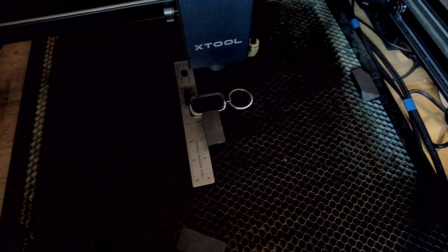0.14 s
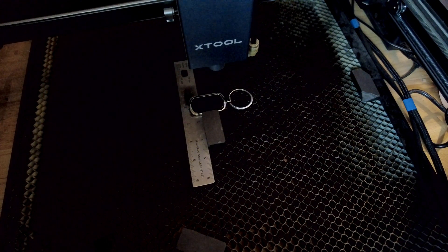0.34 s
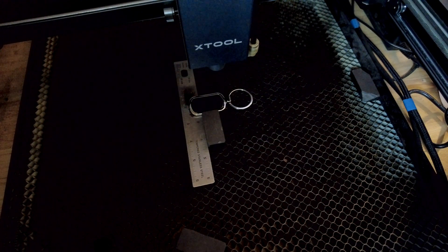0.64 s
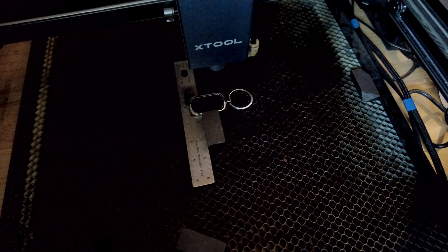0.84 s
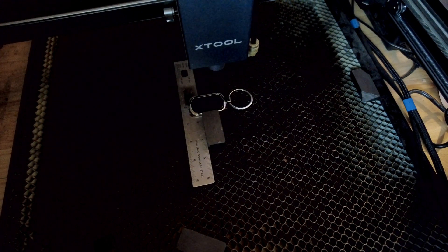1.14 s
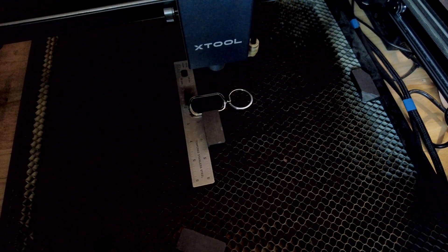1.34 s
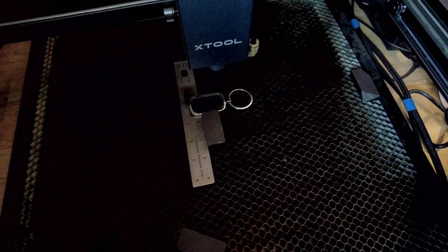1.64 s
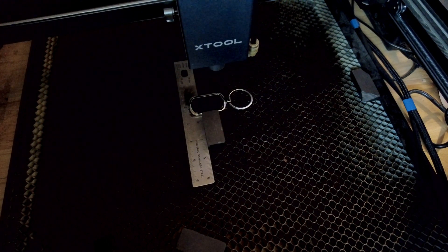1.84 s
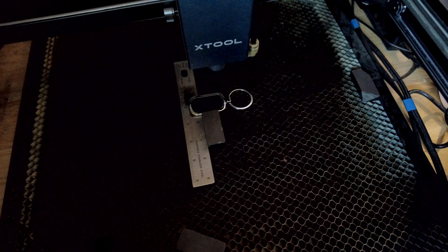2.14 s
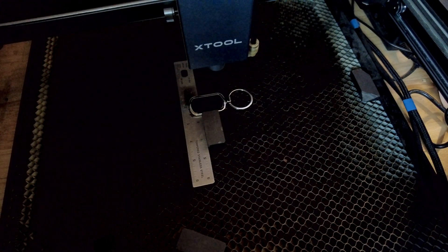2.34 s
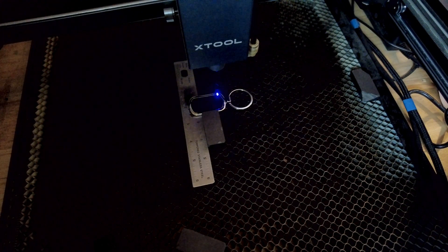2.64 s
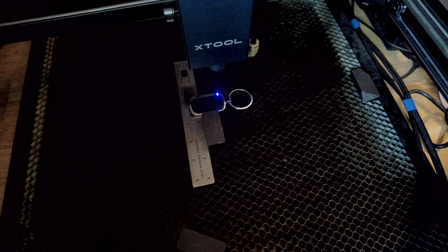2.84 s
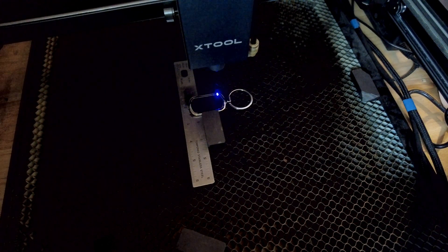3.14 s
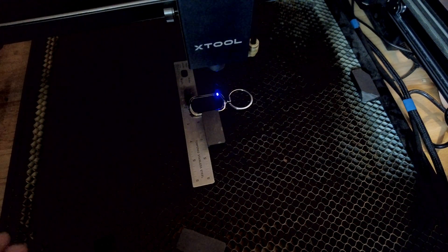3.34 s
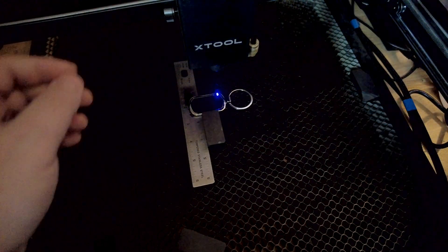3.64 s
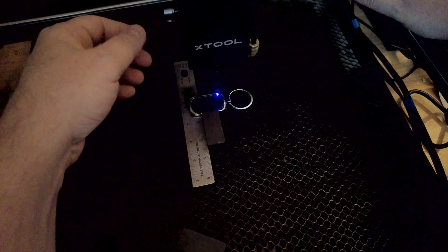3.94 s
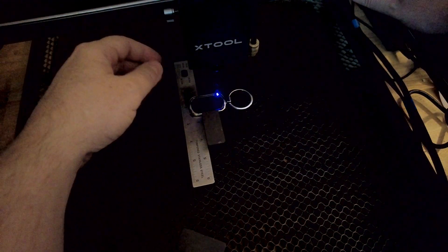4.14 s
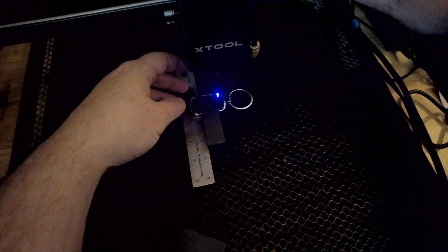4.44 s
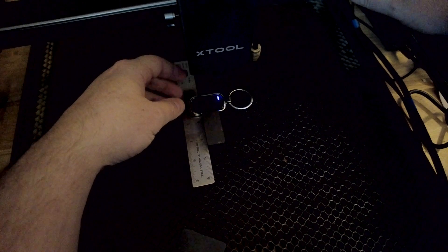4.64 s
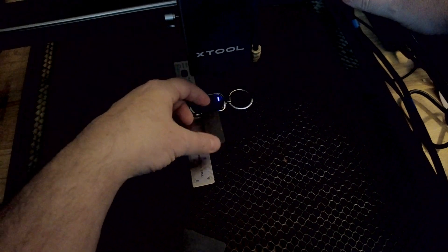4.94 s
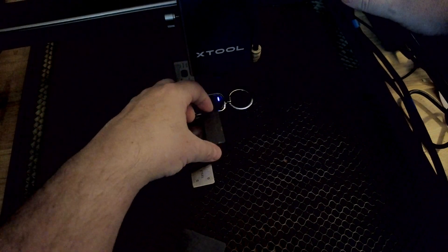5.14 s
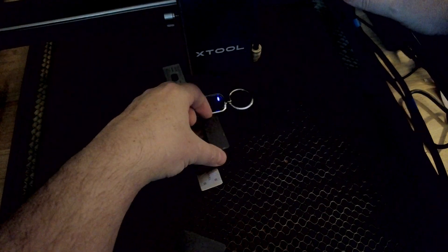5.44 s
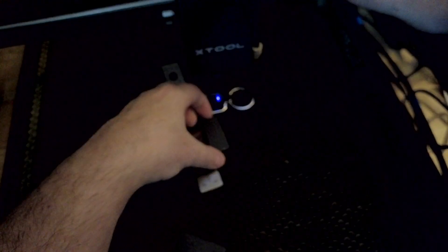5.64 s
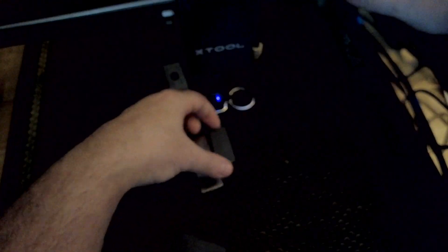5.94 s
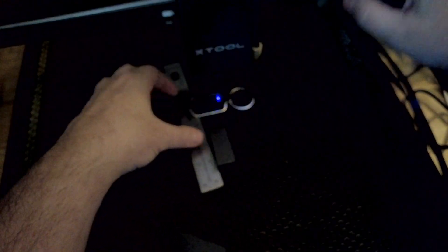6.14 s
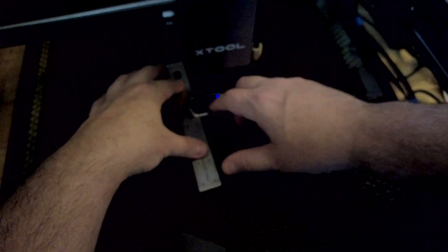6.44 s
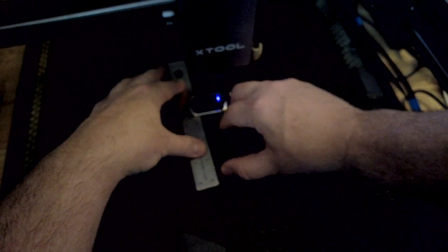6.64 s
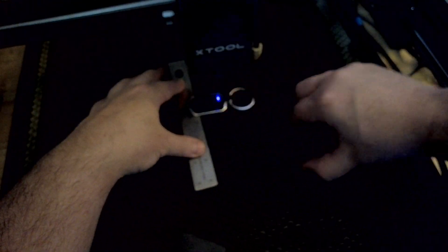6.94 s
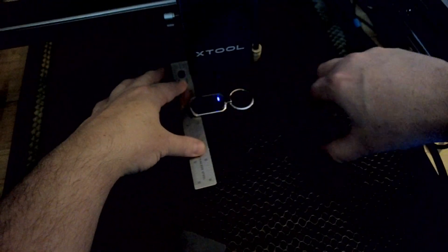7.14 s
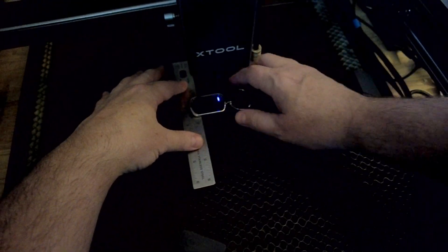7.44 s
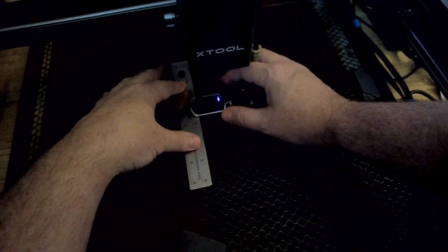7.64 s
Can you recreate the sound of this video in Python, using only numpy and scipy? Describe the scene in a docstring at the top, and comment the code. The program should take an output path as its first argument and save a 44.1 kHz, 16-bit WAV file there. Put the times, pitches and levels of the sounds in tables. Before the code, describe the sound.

A quiet indoor workshop, heard close in stereo: faint dull air and very thin idle equipment tones. Two small crisp plastic clicks come at 0.9 and 1.0 s, fainter clicks, finger brushes and a soft hollow tap around 1.5-1.8, and two more clicks at 2.4-2.5. A faint low motor drone begins near 2.3 and fades after 4.4. At about 2.65 a small fan starts, its whine rising fast with a rasp and a short rattle near 3.0, levelling by about 4.5 into a steady tonal whir, low hum and airy rush that continues to the end. Soft low rubs occur at 4.3-4.8, faint metallic slides at 5.4 and 5.85. From 6.6 to 7.2 hands shift a metal piece: hissing scrapes, a dull thump at 6.8, dry scuffs and tiny high pings, strongest near 7.0. Then only the fan remains.

```python
"""Small fan spin-up in a workshop

Button clicks in a quiet room, then the seven-blade fan of a laser head spins up and holds its speed.
Tones locked to the rotor angle make hum and whine; noise rings the housing as air; a second motor drones.
Hands rub the bed (low noise) and slide a metal piece across it (hiss, pings, scuffs)."""
import sys
import numpy as np
from scipy import signal
from scipy.fft import rfft, irfft, next_fast_len
from scipy.io import wavfile
from scipy.ndimage import uniform_filter1d, map_coordinates

SR = 44100
rng = np.random.default_rng(int(sys.argv[2]) if len(sys.argv) > 2 else 0)


def generate_wav(signal):
    """Clip the signal to [-1, 1] and save it as 16-bit WAV at the path in sys.argv[1]."""
    frames = np.transpose(np.atleast_2d(signal))
    scaled = np.clip(frames, -1, 1) * 32767
    pcm = np.round(scaled).astype(np.int16)
    wavfile.write(sys.argv[1], SR, pcm)


N = 342657
TIME = np.arange(N) / SR


def amp(db):
    """Decibels to gain."""
    return 10 ** (np.asarray(db) / 20)


def unit(x):
    """Scale to rms 1."""
    return x / np.sqrt(np.mean(x ** 2) + 1e-20)


def along(points, hz):
    """Interpolate (hz, value) points on a log-frequency axis."""
    f, v = np.transpose(points)
    return np.interp(np.log(hz + 1), np.log(f + 1), v)


def wobble(rate_hz):
    """Smooth random curve with rate_hz knots a second."""
    knots = rng.standard_normal(int(N * rate_hz / SR) + 4)
    return map_coordinates(knots, [TIME * rate_hz])


def bell(x, centre, width):
    """Resonance shape: 1 at its centre, a half at the edges of its width."""
    return 2 ** -((2 * (x - centre) / width) ** 2)


def stroke(start_s, length_s, attack_s, release_s):
    """Envelope: linear rise from start_s, hold to start_s + length_s, exponential decay."""
    rise = np.clip((TIME - start_s) / attack_s, 0, 1)
    return rise * np.exp(-np.maximum(TIME - start_s - length_s, 0) / release_s)


def filtered(x, response):
    """Multiply the spectrum of x by a response of frequency."""
    m = next_fast_len(N + SR // 2)
    return irfft(rfft(x, m) * response(np.fft.rfftfreq(m, 1 / SR)), m)[..., :N]


def stereo_noise(spectrum, alike):
    """Coloured noise of rms 1; likeness of left and right sets the mid/side split."""
    def split(hz):
        turn = np.arccos(np.clip(along(alike, hz), -1, 1)) / 2
        return amp(along(spectrum, hz)) * [np.cos(turn), np.sin(turn)]
    mid, side = filtered(rng.standard_normal((2, N)), split)
    return unit(np.array([mid + side, mid - side]))


def patchy(x, db, size, count):
    """Random gain patches over pitch and time: frames of size samples, smoothed over count frames."""
    z = signal.stft(x, nperseg=size)[2]
    patches = uniform_filter1d(rng.standard_normal(z.shape[1:]), size=5, axis=0)
    patches = unit(uniform_filter1d(patches, size=count, axis=1))
    return unit(signal.istft(z * amp(db * patches), nperseg=size)[1][:, :N])


def tone(angle, lead_rad, waver_db, rate_hz, apart=0.43):
    """Stereo sine of rms 1: left leads by lead_rad, both sides waver mostly together."""
    common = wobble(rate_hz)
    waver = amp(waver_db * (common + apart * np.array([wobble(rate_hz), wobble(rate_hz)])))
    return unit(waver * np.sin([angle + lead_rad / 2, angle - lead_rad / 2]))


# room air colour: pitch_hz, relative density_db (per Hz)
ROOM_COLOUR = [(12, -23), (20, 1), (106, -6), (137, -11), (196, -11.5), (427, -16.5), (465, -17),
               (620, -15.5), (790, -21), (1070, -23), (1340, -18.5), (1500, -22.5), (2400, -23.5),
               (10800, -39), (13500, -47), (15500, -47)]
# room air stereo: pitch_hz, left-right likeness (-1 to 1)
ROOM_LIKENESS = [(45, .99), (120, .96), (200, 0.91), (400, 0.42), (1000, -0.43), (1500, 0.51),
                 (2600, -0.0028), (6000, 0.3), (15000, 1)]
# idle equipment tones: pitch_hz, level_db, left_lead_rad, smear_rad, waver_db
IDLE_TONES = [(102.3, -72.5, 0.11, 1.0, 3.5), (298, -82, .5, 1.6, 3.5), (592, -80.5, 0.6, 4, 3.8),
              (1125, -80.5, 1.95, 1.3, 3.2), (1314, -79.7, -0.33, .5, 2.5)]


def room(drift_db=.5, middle_drift_db=1):
    """Mottled air murmur with a drifting middle band, plus thin wavering tones of idle equipment."""
    lines = sum(amp(db) * tone(2 * np.pi * hz * TIME + smear_rad * wobble(18), lead_rad, waver_db, 9.09)
                for hz, db, lead_rad, smear_rad, waver_db in IDLE_TONES)
    air = patchy(stereo_noise(ROOM_COLOUR, ROOM_LIKENESS), db=1.8, size=2048, count=5)
    middle = filtered(air, lambda hz: bell(hz, 1140, 1100))
    air = air + (amp(middle_drift_db * wobble(13)) - 1) * middle
    return amp(-63.0 + drift_db * wobble(4.5)) * air + lines


# clicks and small taps: start_s, relative level_db, ring_and_tail_db, pitch_hz, top_treble_db
CLICK_EVENTS = [(0.8985, -41, -6, 8800, -4), (0.9864, -40.5, 0, 7700, 4), (1.577, -55, -5, 9500, 0),
                (1.6826, -48.5, -4, 4700, -9), (1.7714, -53, -5, 8000, -1), (2.395, -42, -1, 8600, -1),
                (2.4955, -40.5, 0, 7000, 4)]
# colour of clicks and brushes: pitch_hz, relative density_db (per Hz)
PLASTIC_COLOUR = [(300, -14), (1400, -5), (2700, -10), (4300, 1), (6500, -3), (7700, 0), (10500, -3),
                  (14200, 3), (15700, -1)]
# button thud and springy ring: pitch_hz, relative level_db, t60_s
BUTTON_MODES = [(130, 5, .22), (4900, -19, .15), (6030, -17.5, .42)]
CLICK_TRIM_DB = -8.5


def clicks(crack_t60_s=0.018, tail_db=-9, tail_t60_s=0.21, grain_db=3, rebound_s=.0098, rebound_db=-11,
           ring_smear_rad=1.3, lift_db=5, width_hz=2600):
    """Short pitched noise crack, one rebound, rough springy ring and the room's scattered tail."""
    out, t = np.zeros((2, N)), np.arange(SR // 2) / SR
    first = amp(-60 * t / crack_t60_s) * (1 - np.exp(-t / .0005))
    rebound = (t > rebound_s) * amp(rebound_db - 60 * np.abs(t - rebound_s) / crack_t60_s)
    blows = first + rebound
    for start_s, db, ring_db, pitch_hz, treble_db in CLICK_EVENTS:
        crack = blows * (rng.standard_normal(len(t)) + .5 * rng.standard_normal((2, len(t))))
        ring = 0
        for hz, mode_db, t60_s in BUTTON_MODES:
            phase = 2 * np.pi * (hz * t + rng.random((2, 1))) + ring_smear_rad * wobble(600)[:len(t)]
            ring = ring + amp(mode_db - 60 * t / t60_s) * np.sin(phase)
        grain = grain_db * wobble(700)[:len(t)]
        tail = amp(tail_db + grain - 60 * t / tail_t60_s) * rng.standard_normal((2, len(t)))

        def colour(hz):
            treble = along([(8000, 0), (14000, treble_db)], hz)
            return amp(along(PLASTIC_COLOUR, hz) + lift_db * bell(hz, pitch_hz, width_hz) + treble)
        click = filtered(crack + amp(ring_db) * (ring + tail), colour)
        start = round(start_s * SR)
        out[:, start:] += amp(db + CLICK_TRIM_DB) * click[:, :N - start]
    return out


# finger brushes: start_s, length_s, level_db
BRUSH_EVENTS = [(1.48, .05, -78), (1.562, .025, -72), (1.684, .05, -73)]


def brushes(attack_s=.012, release_s=.014, grain_db=4):
    """Fingers brush plastic: faint noise with fast random grain."""
    motion = sum(amp(db) * stroke(start_s, length_s, attack_s, release_s)
                 for start_s, length_s, db in BRUSH_EVENTS)
    return motion * unit(amp(grain_db * wobble(300)) * stereo_noise(PLASTIC_COLOUR, [(8000, .6)]))


def knock(start_s=1.638, t60_s=0.062):
    """Soft hollow tap on the bench: decaying noise peaked near 1.5 kHz."""
    colour = [(700, -28), (1300, -11), (1520, 0), (1800, -12), (4000, -26), (10000, -48)]
    decay = amp(-58.5 - 60 * np.abs(TIME - start_s) / t60_s) * (TIME >= start_s)
    return decay * stereo_noise(colour, [(1500, .7)])


DRONE_ON_S, DRONE_HOLD_S, DRONE_DB, DRONE_RELEASE_S = 2.34, 2.1, -59.5, .35


def drone(hz=72, attack_s=.08):
    """A second, slower motor hums through the frame for a while: one slightly smeared sine."""
    level = amp(DRONE_DB) * stroke(DRONE_ON_S, DRONE_HOLD_S, attack_s, DRONE_RELEASE_S)
    return level * tone(2 * np.pi * hz * TIME + .3 * wobble(5), lead_rad=.1, waver_db=.7, rate_hz=6)


START_S, RUN_UP_S = 2.662, .374  # switch-on, run-up time constant
FULL_HZ = 137.835  # nominal turns a second at full speed


def rotor_speed(jitter=0.00038):
    """Share of full speed: exponential approach with slight random unsteadiness."""
    run_up = 1 - np.exp(-np.maximum(TIME - START_S, 0) / RUN_UP_S)
    return run_up * (1 + jitter * wobble(16))


FLOW_FROM, FLOW_BLUR = 0.24, 0.037  # shares of full speed: onset of flow, softness of onset


def grip(speed):
    """0-1: the blades only drive a flow once they turn fast enough."""
    return 1 / (1 + np.exp((FLOW_FROM - speed) / FLOW_BLUR))


RASP_DB, RASP_POWER = -26, 3.94  # gain before pull and speed ** power
RASP_REST_DB = -42  # relative to RASP_DB, present whenever pull > 0


def motor_start(angle, speed, pull, depth=0.43):
    """Coils switch four times a turn, modulating housing noise that rasps with pull and speed."""
    switching = np.cos(4 * angle)
    colour = [(1100, -18), (1300, 5), (1600, 7.5), (2200, 2),
              (2750, 8), (3200, -7), (4500, -13), (9000, -29.0)]
    ring = stereo_noise(colour, [(1000, 0.49)])
    level = pull * speed ** RASP_POWER + amp(RASP_REST_DB) * (pull > 0)
    return amp(RASP_DB) * level * unit((1 + depth * switching) * ring)


# single-tone swells: multiple -> peak_s, width_s, left_db, right_db
SWELLS = {1: [(2.97, .04, 4, 4), (3.02, .05, -7, -7), (3.26, .06, 4, 4), (3.96, .2, 6.5, 5),
          (4.39, .1, 1, 4), (4.72, 0.068, -6, -6), (6.97, 0.77, 2, 1.5)], 7: [(2.77, .08, -10, -10),
          (2.93, .14, 4, 4), (3.035, .05, 6, 6), (3.13, .06, 9, 9), (3.2, .05, -5, -5), (3.47, .18, -7, -7),
          (3.65, 0.09, 7, 9), (4.4, 0.48, 9, 9)], 14: [(2.87, 0.11, -6, -6), (3.07, 0.08, -1, -3),
          (3.21, .12, -7, -7), (3.4, .08, 3, 1), (3.56, .16, 2, -1), (3.74, .06, 4, 3), (4.07, .12, -7, -7),
          (5.5, 1.2, -1, 1.5), (6.65, .4, -3, 0)], 21: [(2.885, .08, 4, 3), (3.09, 0.12, -10, -10),
          (3.25, .25, -3, -4), (3.92, 0.23, -3.5, -3), (4.28, .22, -1, -7), (4.55, .16, -4, -2),
          (5.35, .5, 1.5, .5), (6.75, .3, 0, -3), (7.2, 0.33, 2.5, 2), (7.49, .14, -2.5, -10)],
          28: [(3.25, .4, -9, -8), (3.75, .25, 4, 4), (4.3, 0.35, 9, 4)], 35: [(3.55, .14, 6, 7),
          (3.775, .07, 6, 6), (4.7, .6, 7, 0)]}


def swell_db(multiple):
    """Left and right level change of one tone over time, as bells in dB."""
    return sum(np.outer([left_db, right_db], bell(TIME, peak_s, width_s))
               for peak_s, width_s, left_db, right_db in SWELLS.get(multiple, []))


# imbalance hum and seven-blade passing whines: multiples of the turning rate
TONE_MULTIPLES = [1, 7, 14, 21, 28, 35]
# one row per multiple: level_db (full speed, before frame, swells and reach), speed_power,
# reach_db (at full reach), left_lead_rad (at full load), left_minus_right_db, smear_rad, waver_db
TONE_SETTINGS = [(-49.3, 1.3, 5.5, 0.28, 0, 0.032, 0.67), (-56.5, 1.3, -6, .6, 2, 0.35, 2.8),
                 (-40, 3.7, -.5, -0.18, 1, 0.07, 0.8), (-37.6, 4.7, -4, -1.55, 2, 0.14, 0.5),
                 (-54, 3.6, -6, -1.53, -1.5, 0.28, 2.8), (-61.5, 4, 0, -0.41, -2, .15, 2.5)]
# frame peaks and notches swept by the tones: centre_hz, width_hz, lift_db
FRAME_MODES = [(73, 18, 7), (100, 14, 6.5), (140.47, 9.9, 14), (575, 160, 4), (798, 44, 8.5),
               (907, 27, 7.5), (1270, 320, 9.5), (1430, 100, -7), (1860, 51, -3.5), (2024, 180, -3),
               (2642, 41, -19), (2817, 61, 3.5), (3720, 220, 3.5), (4575, 110, 9)]
# arms between fan and microphone: time_s, reach (0-1)
ARM_REACH = [(4.14, 0.03), (4.3, 0.43), (4.54, 0.3), (4.68, 0.06), (5.8, 0.18), (6.15, 0.47), (6.8, 0.9),
             (7.15, 0.6), (7.6, 0.47)]
SHADOW_DB, SHADOW_ABOVE_HZ = 5, 2400  # left-right tilt at full reach: arms screen the right
GLIDE_SMEAR_RAD, FLUTTER_DB = .18, 2  # extra at zero load, fading as load builds


def fan_tones(angle, speed, load, waver_hz=11, smear_hz=75):
    """Hum and whines grow with speed, swell at frame resonances and flutter while they glide."""
    reach = np.interp(TIME, *np.transpose(ARM_REACH))
    out = np.zeros((2, N))
    for multiple, settings in zip(TONE_MULTIPLES, TONE_SETTINGS):
        db, power, reach_db, lead_rad, pan_db, smear_rad, waver_db = settings
        hz = multiple * FULL_HZ * speed
        # frame response updated every 64 samples
        frame_db = sum(lift_db * bell(hz[::64], centre_hz, width_hz)
                       for centre_hz, width_hz, lift_db in FRAME_MODES).repeat(64)[:N]
        flutter_db = FLUTTER_DB * (1 - load) * wobble(45)
        level_db = db + frame_db + swell_db(multiple) + reach_db * reach + flutter_db
        level = amp(level_db) * speed ** power
        glide_rad = GLIDE_SMEAR_RAD * (1 - load) * (multiple > 1)
        phase = multiple * angle + (smear_rad + glide_rad) * wobble(smear_hz)
        balance_db = pan_db + SHADOW_DB * reach * (hz > SHADOW_ABOVE_HZ)
        balance = amp([balance_db / 2, -balance_db / 2])
        out += level * tone(phase, lead_rad * load ** 3, waver_db, waver_hz) * balance
    return out * grip(speed)


# weaker rotor orders: multiple -> relative level_db
WEAK_ORDERS = {3: -21, 8: -15, 12: -20, 16: -12, 20: -14, 42: -23}
RUSH_POWER = 3.35  # power of speed, shared by weak orders and rushing air


def weak_orders(angle, speed, load, full_db=-43, shake_rad=0.24):
    """Turbulence shakes the weaker orders in phase and strength."""
    level = amp(full_db) * speed ** RUSH_POWER * (1 + load) / 2
    return level * sum(amp(db) * tone(multiple * angle + shake_rad * wobble(25),
                                      lead_rad=-.04 * multiple, waver_db=-2.5, rate_hz=16)
                       for multiple, db in WEAK_ORDERS.items())


# air common to both sides: pitch_hz, relative density_db (per Hz)
AIR_MID_COLOUR = [(25, -92), (110, -71), (230, -72.5), (340, -68.5), (600, -71), (860, -74), (1030, -69.5),
                  (1800, -67.5), (2450, -71.5), (3100, -73), (5200, -80.5), (8400, -86), (11000, -93),
                  (15500, -91.5)]
# air differing between sides: pitch_hz, relative density_db (per Hz)
AIR_SIDE_COLOUR = [(25, -87), (130, -77), (230, -85), (340, -77.5), (600, -78), (820, -71.5), (1050, -72.5),
                   (1330, -76), (1680, -72.5), (2200, -78), (3100, -76.5), (6000, -80.5), (9500, -112),
                   (15000, -106)]
# housing resonances: centre_hz, width_hz, mid_lift_db, side_lift_db (lifts before scaling by lift)
HOUSING_MODES = [(431, 34.4, 13.5, 6), (502.4, 45, 13, 9), (1061, 57, 7, 3), (1157, 73, 5, 10),
                 (1288.5, 187, 13, -3), (1520, 75, 5, -3), (2814, 160, 6.5, -1), (4480, 470, 5, -3),
                 (7720, 410, 7, 12), (9340, 330, 5, 25)]
# tilt of slow-fan air: pitch_hz, tilt_db
SLOW_TILT = [(180, -6), (330, -2.5), (480, -12.5), (700, 2), (980, -6), (1300, 0.5), (1650, 1), (2600, 1),
             (8000, -2)]
# phase of the rush: pitch_hz, left_lead_rad (negative: left lags)
RUSH_LEAD = [(1400, 0.055), (2400, -0.033), (3900, -1.26), (6000, -0.96), (7200, 0)]
RUSH_DB = -32.5  # above the split, at full speed
BODY_DB, BODY_KNEE, BODY_POWER = -40.5, 0.74, 3.14  # below the split: ceiling, speed share, growth


def fan_air(speed, load, early_lift=0.63, late_lift=0.95, split_hz=900, patchy_db=0.7):
    """Turbulent air rings the housing more as flow builds; low body levels off, high rush keeps growing."""
    def colour(hz, lift):
        db = np.array([along(AIR_MID_COLOUR, hz), along(AIR_SIDE_COLOUR, hz)])
        for centre_hz, width_hz, mid_db, side_db in HOUSING_MODES:
            db += lift * np.outer([mid_db, side_db], bell(hz, centre_hz, width_hz))
        return amp(db)
    eddies = rng.standard_normal((2, N))
    slow = filtered(eddies, lambda hz: colour(hz, early_lift) * amp(along(SLOW_TILT, hz)))
    fast = filtered(eddies, lambda hz: colour(hz, late_lift))
    mid, side = (1 - load) * slow + load * fast
    air = np.array([mid + side, mid - side])
    low = filtered(air, lambda hz: 1 / (1 + (hz / split_hz) ** 10))
    high = filtered(air - low, lambda hz: np.exp(.5j * np.outer([1, -1], along(RUSH_LEAD, hz))))
    growth = (speed / BODY_KNEE) ** BODY_POWER
    body = amp(BODY_DB + 0.95 * wobble(8)) * growth / np.hypot(1, growth)
    rush = amp(RUSH_DB + patchy_db * wobble(12)) * speed ** RUSH_POWER
    balance = amp([[.3], [-.3]])
    return grip(speed) * (body * unit(low) + rush * unit(high) * balance)


# bed rumble colour: pitch_hz, relative density_db (per Hz)
RUMBLE_COLOUR = [(25, -22), (55, 6), (80, 6), (130, 13), (240, -10), (500, -25), (1200, -56)]
# deep sway colour: pitch_hz, relative density_db (per Hz)
SWAY_COLOUR = [(12, -14), (25, -5), (55, 5), (75, -3), (110, -20), (300, -38)]
# hands rubbing the bed: start_s, length_s, rumble_db, sway_db
RUB_EVENTS = [(4.3, 0.19, -47.5, -58), (4.554, 0.26, -46, -58), (6.585, .05, -56, -43),
              (6.68, .02, -56, -45.5), (6.785, 0.05, -45, -45), (6.885, .03, -47, -41),
              (6.955, .09, -50, -45), (7.09, 0.09, -52, -41)]
RUB_ATTACK_S, RUB_RELEASE_S = 0.014, 0.032
TREMBLE_DB, SWAY_DB = -69, -64  # rumble and sway at full speed
KICK_DB = -51  # sway from the rotor's pull, before pull * speed


def bed(speed, pull):
    """The bed trembles under the fan, and rumbles and sways when hands rub it."""
    rumble = amp(TREMBLE_DB) * speed
    sway = (amp(SWAY_DB) + amp(KICK_DB) * pull) * speed
    for start_s, length_s, rumble_db, sway_db in RUB_EVENTS:
        push = stroke(start_s, length_s, RUB_ATTACK_S, RUB_RELEASE_S)
        rumble = np.hypot(rumble, amp(rumble_db) * push)
        sway = np.hypot(sway, amp(sway_db) * push)
    rumble_noise = unit(amp(1.5 * wobble(22)) * stereo_noise(RUMBLE_COLOUR, [(100, 0.9)]))
    sway_noise = unit(amp(1.7 * wobble(14)) * stereo_noise(SWAY_COLOUR, [(50, 0.97)]))
    return rumble * rumble_noise + sway * sway_noise


def rattle(start_s=3.035, length_s=0.027, db=-44, release_s=0.025):
    """The housing rattles briefly as the rotor gathers speed: a short broadband burst."""
    colour = [(300, -1), (1300, 1), (2700, 0), (3600, -9), (8000, -11.5), (15000, -32)]
    return amp(db) * stroke(start_s, length_s, 0.0093, release_s) * stereo_noise(colour, [(1000, 0.6)])


# metal hiss colour: pitch_hz, relative density_db (per Hz)
SCRAPE_COLOUR = [(700, -33), (1800, -1.5), (5000, -9), (6800, -13), (7900, -1.5), (9300, -2.5), (11500, -5),
                 (14000, -8), (15700, -13)]
# metal slides on the bed: start_s, length_s, level_db
SLIDE_EVENTS = [(3.44, .06, -54), (5.358, .06, -49), (5.85, 0.086, -46.5), (6.68, 0.15, -44),
                (6.787, 0.095, -38), (6.88, 0.12, -35.5), (7.012, 0.04, -35.5), (7.055, 0.056, -33.5)]
SLIDE_ATTACK_S, SLIDE_RELEASE_S = 0.013, 0.023
SLIP_DB, SLIP_HZ, SCRAPE_PATCHY_DB = 1.7, 70, 3.1  # slip depth and rate, depth of pitch patches


def sliding_metal():
    """Metal hisses in tiny uneven slips; the moving contact point favours changing pitches."""
    hiss = patchy(stereo_noise(SCRAPE_COLOUR, [(9000, 0.7)]), SCRAPE_PATCHY_DB, size=256, count=8)
    motion = np.max([amp(db) * stroke(start_s, length_s, SLIDE_ATTACK_S, SLIDE_RELEASE_S)
                     for start_s, length_s, db in SLIDE_EVENTS], axis=0)
    return motion * unit(amp(SLIP_DB * wobble(SLIP_HZ)) * hiss)


# passing-arm echoes: peak_s, width_s, centre_hz, width_hz, lift_db
ECHO_EVENTS = [(3.725, 0.36, 785, 258, 3), (4.773, 0.3, 740, 380, -9), (4.854, 0.59, 1280, 220, 2.5)]


def arm_echoes(air):
    """Air noise bouncing off the passing arm reinforces or cancels a band for a moment."""
    for peak_s, width_s, centre_hz, width_hz, db in ECHO_EVENTS:
        band = filtered(air, lambda hz: bell(hz, centre_hz, width_hz))
        air = air + (amp(db * bell(TIME, peak_s, width_s)) - 1) * band
    return air


# metal catches: start_s, level_db, ping_hz
CATCH_EVENTS = [(6.6936, -43, 7740), (6.74, -44, 7750), (6.7899, -38, 9170), (6.9475, -36, 8750),
                (7.0097, -26.5, 9100), (7.062, -29.5, 9540), (7.096, -34, 8200), (7.134, -35, 7810)]


def catches(t60_s=0.041, crack_db=-5, smear_rad=0.81):
    """Each catch on the bed's mesh is a tiny noise crack and a short, high, smeared ping."""
    out = np.zeros((2, N))
    crack = stereo_noise([(3000, -12), (7500, 3), (15500, -5)], [(9000, .67)])
    for start_s, db, hz in CATCH_EVENTS:
        phase = 2 * np.pi * hz * TIME + smear_rad * wobble(900)
        ping = tone(phase, lead_rad=.4, waver_db=5, rate_hz=200)
        decay = amp(db - 60 * np.abs(TIME - start_s) / t60_s) * (TIME >= start_s)
        out += decay * (ping + amp(crack_db) * crack)
    return out


# metal bumps: start_s, level_db
BUMP_EVENTS = [(6.805, -34), (7.01, -29), (7.072, -34)]


def bumps(length_s=0.013, attack_s=.009, release_s=.013):
    """The metal piece bumps its neighbours: short dry scuffs of noise."""
    colour = [(600, -18), (1400, 6), (2200, 0), (4000, -9), (6500, -18), (9000, -6), (15000, -22)]
    motion = sum(amp(db) * stroke(start_s, length_s, attack_s, release_s) for start_s, db in BUMP_EVENTS)
    return motion * stereo_noise(colour, [(2000, 0.5)])


def thump(start_s=6.808, t60_s=0.32):
    """A hand comes down on the bed: low noise with a soft attack and a dull decay."""
    colour = [(120, -31), (225, 2), (310, -8), (420, -6), (600, -14), (1500, -35)]
    decay = amp(-32.0 - 60 * np.abs(TIME - start_s) / t60_s)
    return decay * np.clip((TIME - start_s) / 0.011, 0, 1) * stereo_noise(colour, [(300, .85)])


def scene(load_power=9, coils_on_s=2.645, soft_start_s=0.016):
    """Sum all sources; motor pull fades and fan load builds steeply near full speed."""
    speed = rotor_speed()
    angle = 2 * np.pi * FULL_HZ * np.cumsum(speed) / SR
    load = np.minimum(speed, 1) ** load_power
    pull = np.maximum(1 - speed, 0) * np.clip((TIME - coils_on_s) / soft_start_s, 0, 1)
    background = room() + clicks() + brushes() + knock() + drone()
    air = arm_echoes(fan_air(speed, load))
    fan = motor_start(angle, speed, pull) + fan_tones(angle, speed, load) + weak_orders(angle, speed, load)
    handling = sliding_metal() + catches() + bumps() + thump()
    return background + fan + air + bed(speed, pull) + rattle() + handling


TOP_HZ = 15800


def record(dry):
    """Keep nothing at or above the band limit."""
    return filtered(dry, lambda hz: hz < TOP_HZ)


dry = scene()
out = record(dry)
generate_wav(out)
```